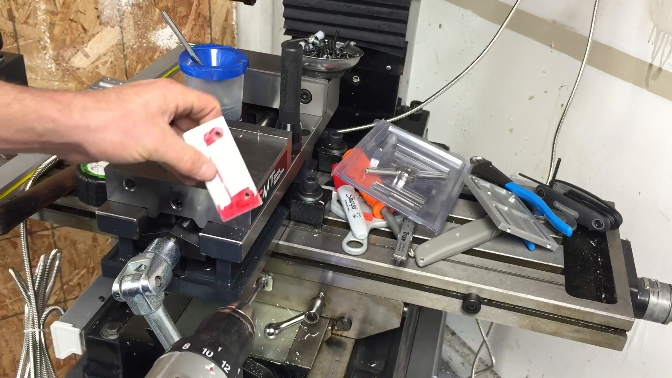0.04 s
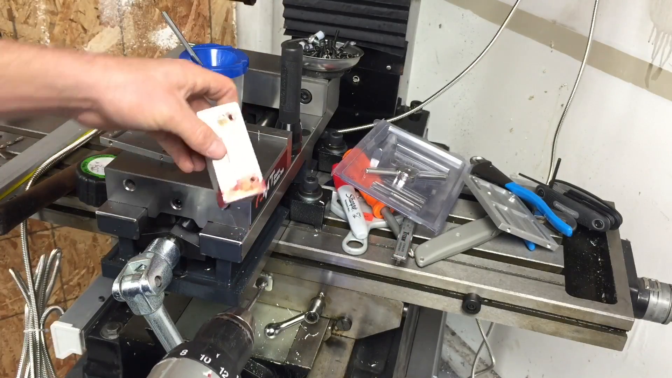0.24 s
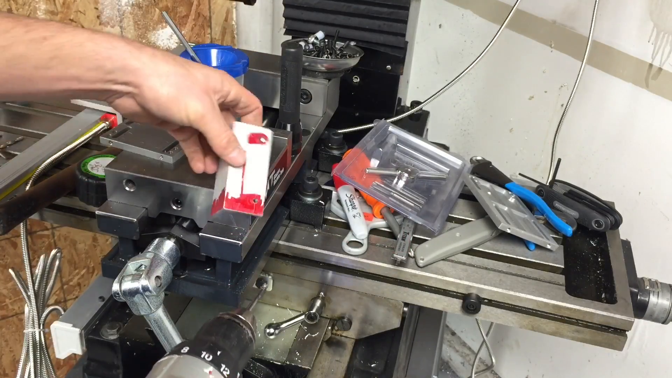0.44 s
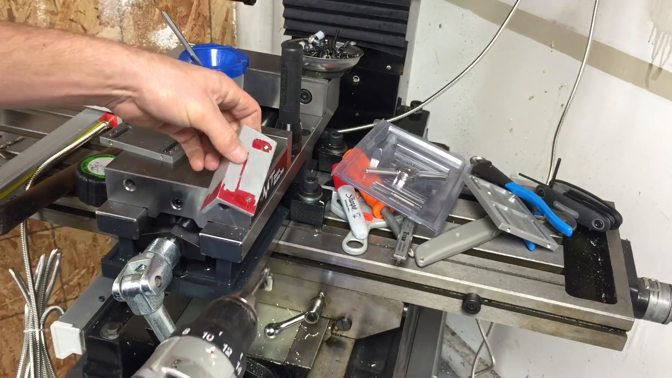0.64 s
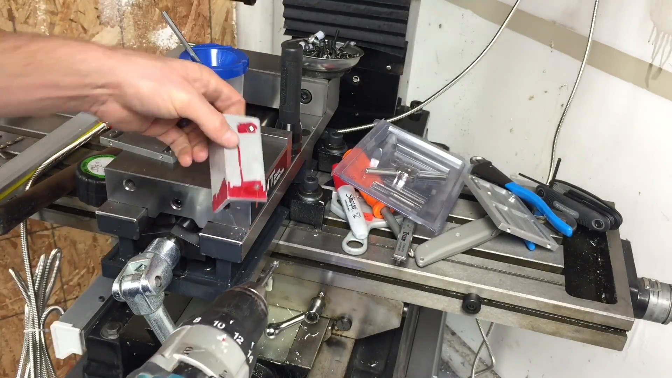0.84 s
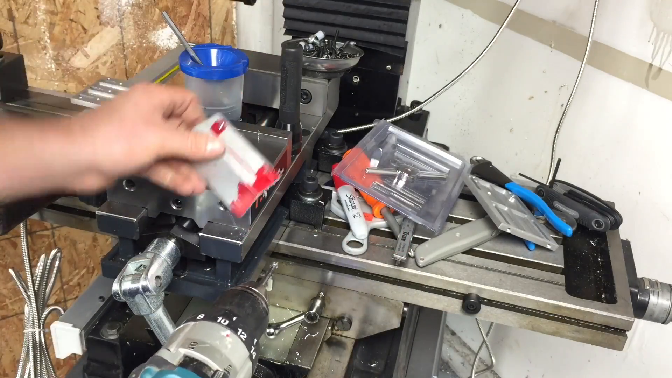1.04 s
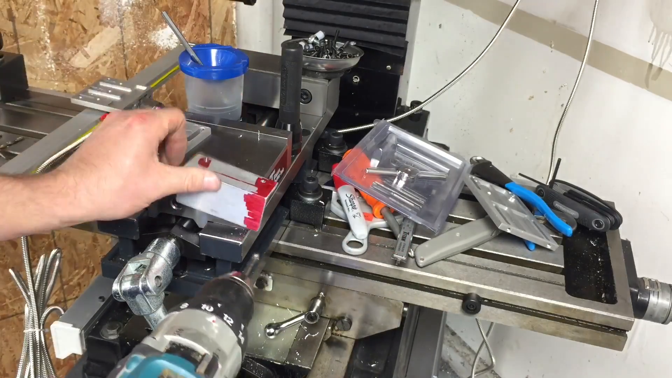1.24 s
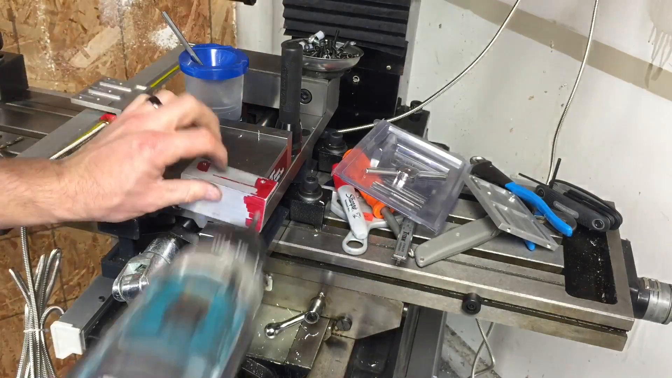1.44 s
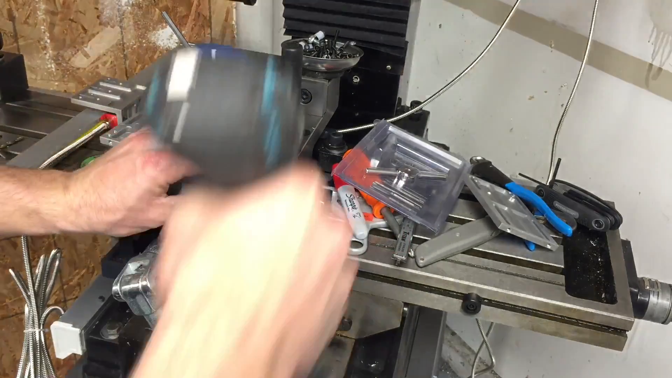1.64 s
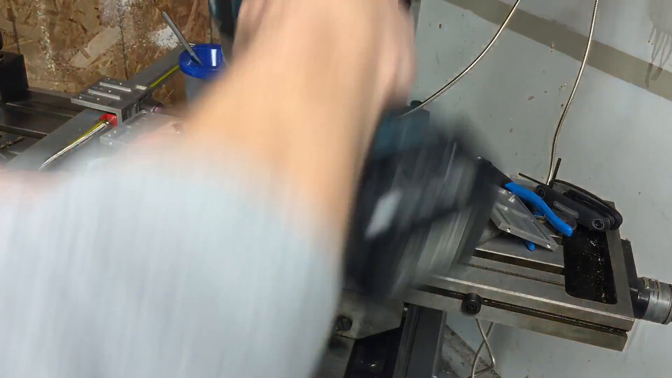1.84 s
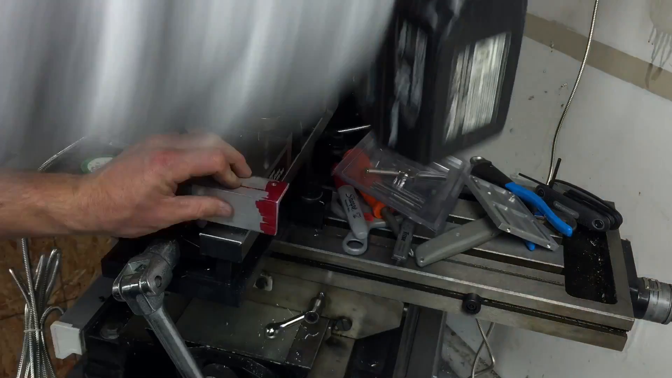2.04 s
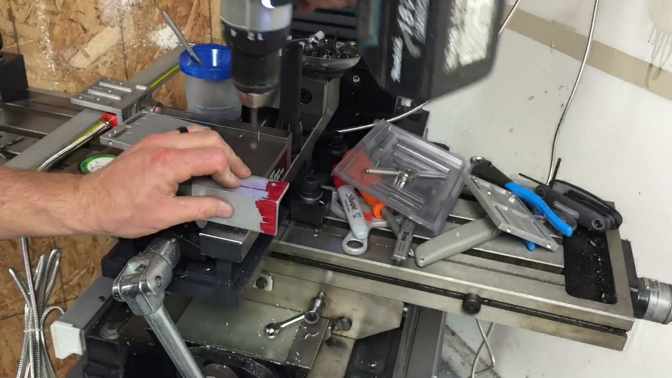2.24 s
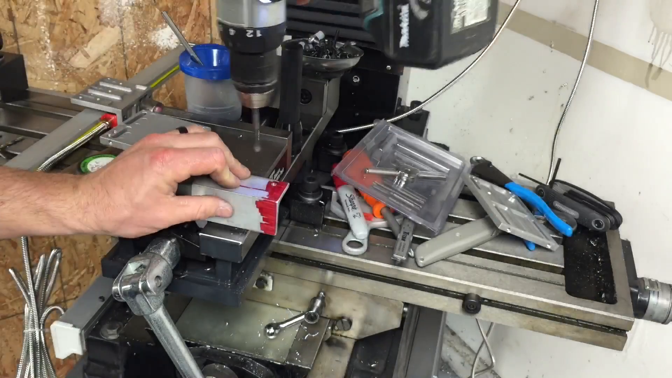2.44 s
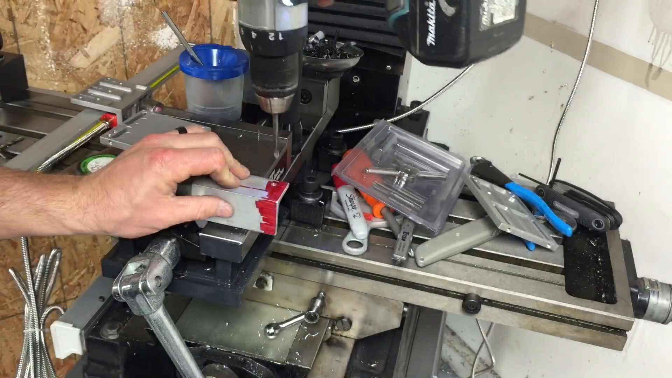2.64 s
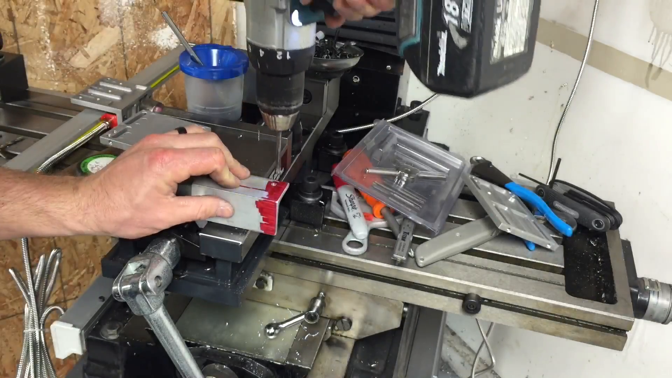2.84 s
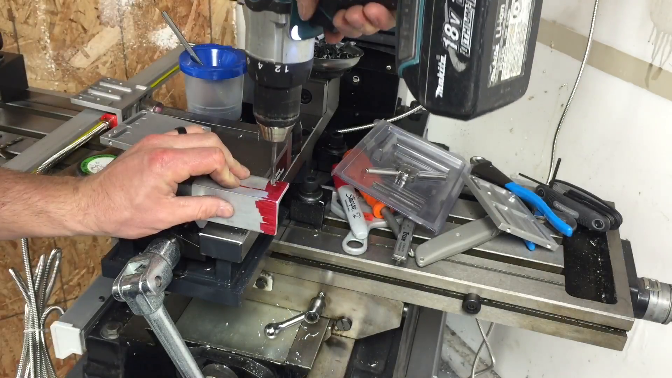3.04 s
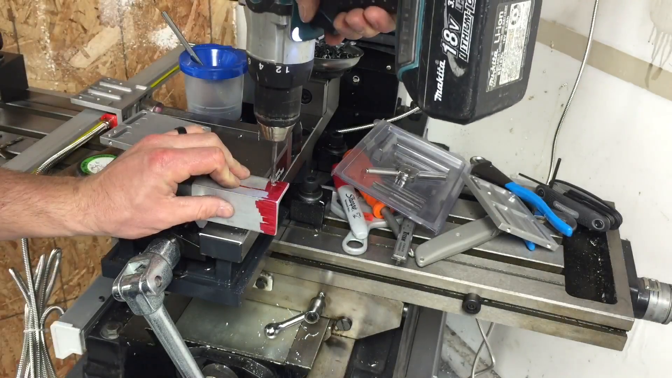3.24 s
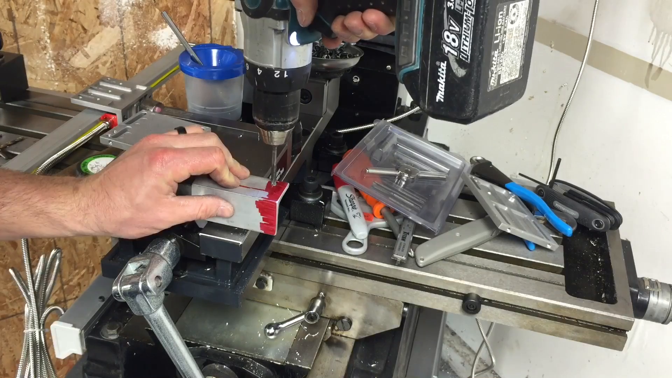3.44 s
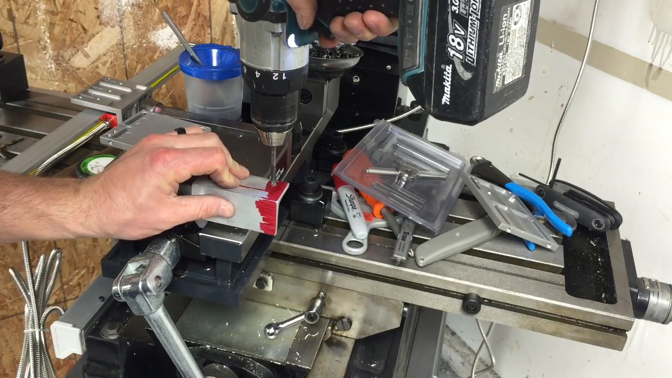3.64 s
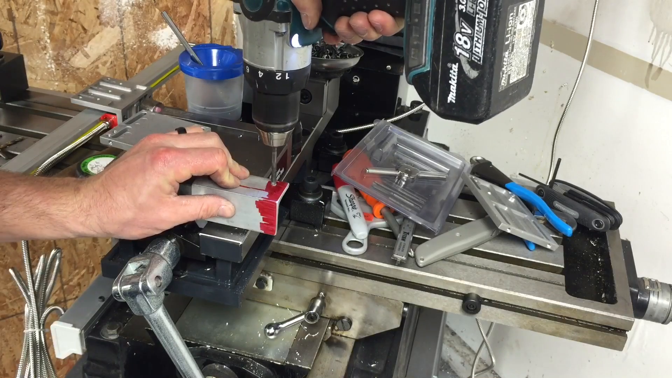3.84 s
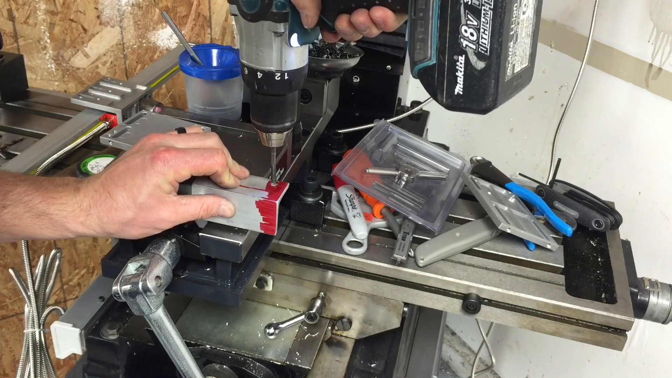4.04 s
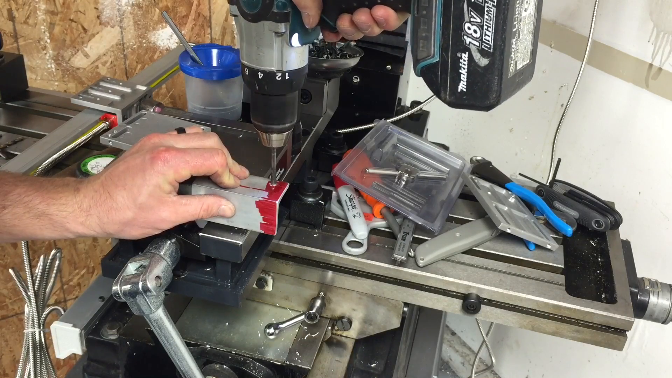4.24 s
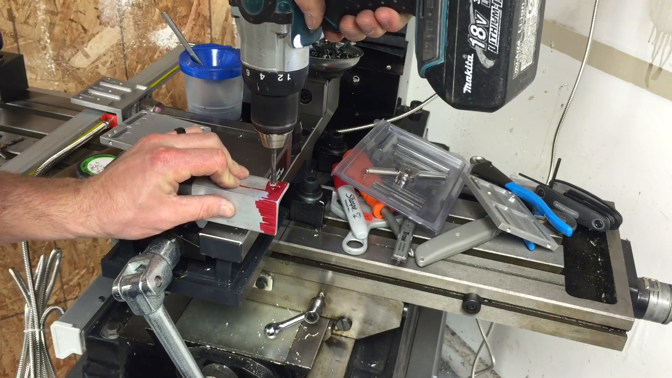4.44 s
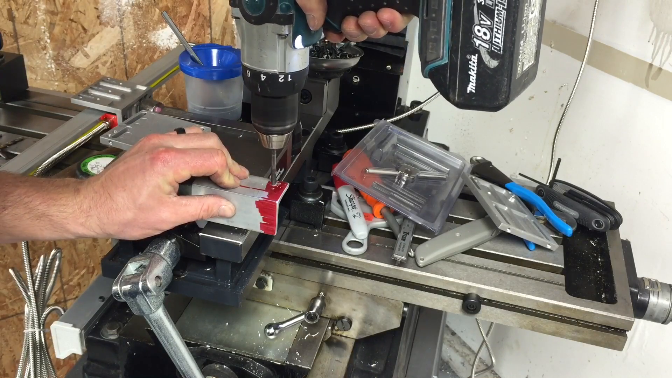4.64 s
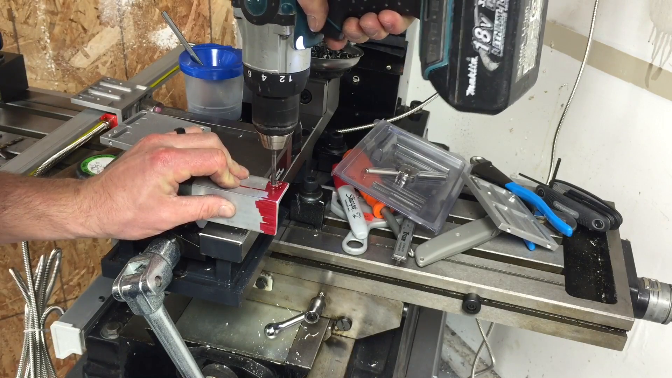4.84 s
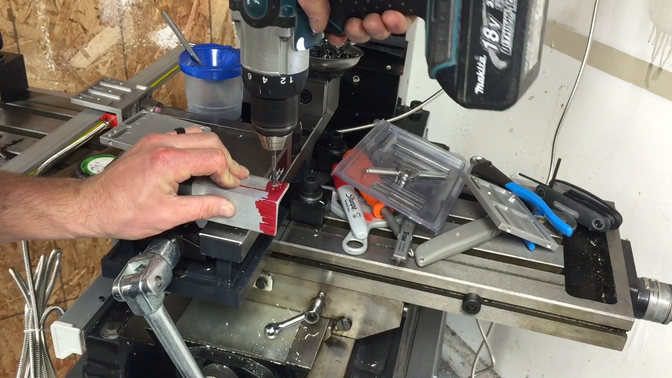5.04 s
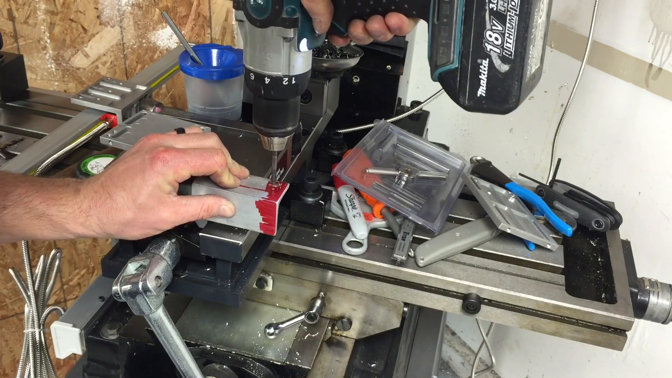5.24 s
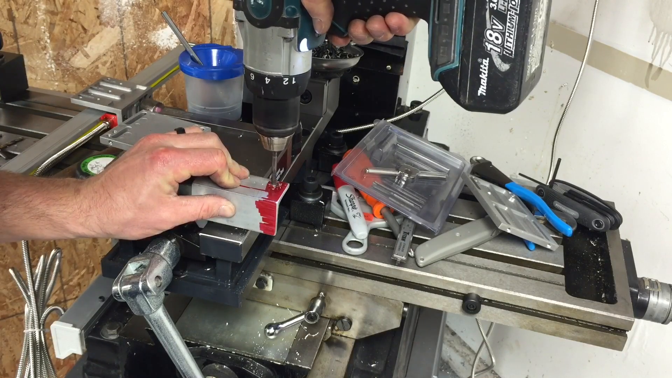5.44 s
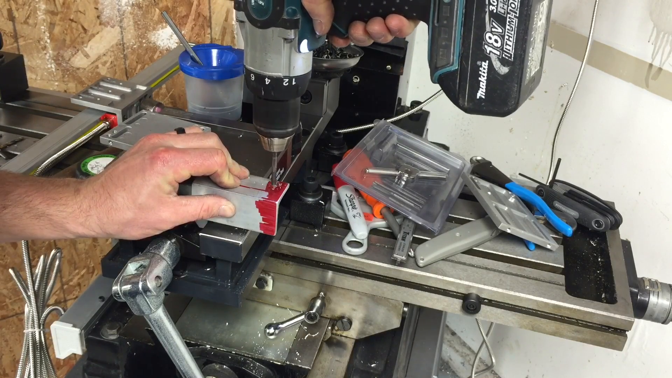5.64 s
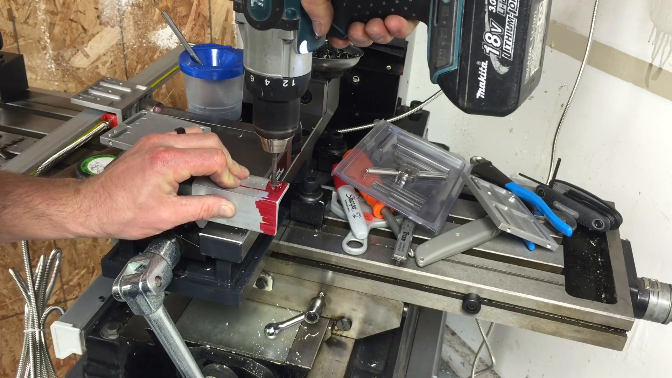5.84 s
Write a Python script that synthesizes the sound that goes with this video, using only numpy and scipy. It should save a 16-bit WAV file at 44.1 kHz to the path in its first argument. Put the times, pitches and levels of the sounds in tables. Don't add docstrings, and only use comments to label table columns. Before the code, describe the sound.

Close to the bench in a softly humming workshop, a small metal bracket clinks against a heavy vise, twice more in clusters, with brief scrapes. A drill switch snaps and the tool is nudged into place with dull clicks. After near quiet, the drill runs in two roughly one-second bursts, buzzing, hissing and whining with uneven gear speed. Short room echo.

```python
import sys
import numpy as np
from scipy import signal
from scipy.fft import rfft, irfft
from scipy.io import wavfile

SR = 44100
rng = np.random.default_rng(int(sys.argv[2]) if len(sys.argv) > 2 else 0)


def bounce(signal):
    frames = np.transpose(np.atleast_2d(signal))
    limited = np.clip(frames, -1, 1)
    pcm = np.round(limited * 32767).astype(np.int16)
    wavfile.write(sys.argv[1], SR, pcm)


def voltage_ratio(decibels):
    exponent = np.asarray(decibels, float) / 20
    return 10 ** exponent


N = 260345


def evened(x):
    return x / np.sqrt(np.mean(x ** 2) + 1e-20)


def read(points, hz):
    f, value = np.transpose(points)
    return np.interp(np.log(hz + 1), np.log(f + 1), value)


def add(mix, s, sound):
    part = mix[round(s * SR):][:len(sound)]
    part += sound[:len(part)]


def follow(rows, t):
    s, *columns = np.transpose(rows)
    return [np.interp(t, s, c) for c in columns]


def unroll(rows):
    start, end = rows[0][0], rows[-1][0]
    return start, follow(rows, np.arange(start, end, 1 / SR))


def colour(x, points):
    hz = abs(np.fft.fftfreq(4096, 1 / SR))
    log_gain = np.log(voltage_ratio(np.maximum(read(points, hz), -90)))
    minimum_phase = np.exp(np.conj(signal.hilbert(log_gain)))
    return signal.oaconvolve(x, np.fft.ifft(minimum_phase).real[:2048])[:len(x)]


def resonate(x, hz, width):
    return signal.lfilter(*signal.iirpeak(min(hz, .45 * SR), hz / width, SR), x)


def drift(n, hz):
    slow = signal.butter(2, hz, fs=SR, output="sos")
    return evened(signal.sosfilt(slow, rng.standard_normal(n + 9000))[9000:])


def ring(hz, db, t60, phase=0.):
    t = np.arange(16000) / SR
    onset = 1 - np.exp(-t / 0.00016)
    return voltage_ratio(db - 60 * t / max(t60, .004)) * np.sin(2 * np.pi * hz * t + phase) * onset


# (frequency [Hz], level [dB])
CHOP_SPECTRUM = [(100, -21.5), (250, 1.5), (500, 9.5), (770, -5.5), (1050, 12.5), (1300, 12), (1530, 14),
                 (1840, 3.5), (2500, 11.5), (3400, -16), (4800, -13.5)]


def chop_buzz(jolts, low_db, octaves, age):
    high_db = -38.5 - 5 * octaves + 3.5 * np.exp(-age / 0.032)
    low = voltage_ratio(low_db - 2.0) * evened(colour(sum(jolts[:3]), CHOP_SPECTRUM))
    high = voltage_ratio(high_db) * evened(colour(sum(jolts[3:]), CHOP_SPECTRUM))
    steady_pulse = voltage_ratio(-50.5) * jolts[0]
    return low + high + steady_pulse


# (frequency [Hz], level [dB per Hz])
RATTLE_SPECTRUM = [(60, -32), (150, -57), (250, -19), (500, -6), (830, -7), (1500, -0.5), (2400, -0.5),
                   (3600, -3), (4600, -6), (6500, -25), (9000, -63.5)]
# (frequency [Hz], level [dB per Hz])
HISS_SPECTRUM = [(2940, -11.5), (5000, 1.5), (6140, -0.5), (7310, -1.5), (9620, -4), (11100, -4.5),
                 (15700, -16.5), (16300, -31), (16500, -64)]
# (frequency [Hz], width [Hz], level [dB])
HOUSING_MODES = [(1506, 88, -35.5), (3690, 1200, -7), (5410, 104, 1.5), (7300, 510, -1),
                 (10600, 1700, -30.5), (14700, 1100, -3)]
# (frequency [Hz], width [Hz], level [dB])
VENTS = [(6880, 310, -21.5), (11140, 1020, -2)]


def rattle_and_hiss(turns, effort_db, octaves):
    n = len(turns)
    rattle_db = -36 + 0.49 * (effort_db + 36) + 3 * octaves
    beat = 4.3 + np.exp(-(turns % 1) / 2.7)
    knock_db = 0.55 * np.minimum(rng.exponential(1, n), 4.5)
    teeth = evened(rng.standard_normal(n) * voltage_ratio(knock_db) * (rng.random(n) < 6000 / SR))
    rattle = evened(colour(teeth * beat * voltage_ratio(0.8 * drift(n, 32)), RATTLE_SPECTRUM))
    rubbing = (rng.standard_normal(n) + 0.4 * teeth) * (beat + .5) * voltage_ratio(drift(n, 23))
    brushes = evened(colour(rubbing, HISS_SPECTRUM))
    bare = voltage_ratio(rattle_db + 3.0) * rattle + brushes * voltage_ratio(effort_db - 0.8)
    sound = bare.copy()
    for hz, width, db in HOUSING_MODES:
        mode = resonate(resonate(bare, hz, width), hz, 1.7 * width)
        sound += voltage_ratio(db + 0.66 * drift(n, 5.7)) * mode
    fan_db = effort_db - 9 * octaves + drift(n, 2.2)
    for hz, width, db in VENTS:
        sound += voltage_ratio(fan_db + db) * resonate(resonate(brushes, hz, width), hz, 1.5 * width)
    return voltage_ratio(-1.0) * sound


def squeal(jolt, chop_hz, octaves, age):
    mode_hz, width_hz = 1510, 110
    nearness = 1 / (1 + ((6 * chop_hz - mode_hz) / width_hz) ** 2)
    level = voltage_ratio(-40 - 9 * octaves) * np.minimum(age / .3, 1)
    return jolt * voltage_ratio(2.5 * drift(len(jolt), 45)) * nearness * level


# (time [s], level [dB], length [s])
GRAB_EVENTS = [
    (4.283, -62, 0.17),
    (4.563, -43, 0.061),
    (4.684, -43.5, .09),
    (5.04, -68, .05),
    (5.255, -59, 0.065),
    (5.477, -61, 0.17),
]


def vise_shake(t):
    grip = voltage_ratio(-83)
    for at, db, length in GRAB_EVENTS:
        grip = grip + voltage_ratio(db) * np.exp(-(2 * (t - at) / length) ** 2)
    return grip * evened(resonate(resonate(rng.standard_normal(len(t)), 113, 160), 176, 240))


# (time [s], current chops [Hz], jolt level [dB])
TRIGGER_PULLS = [
    [(3.755, 201.8, -42), (3.81, 255.7, -38), (3.865, 208.8, -46), (3.97, 210.4, -38), (4.06, 237, -40.5),
     (4.385, 260.5, -40.5), (4.52, 241.8, -50.5), (4.76, 250.9, -45.5), (4.865, 266.3, -44)],
    [(4.995, 201.7, -42.5), (5.045, 259.6, -39), (5.07, 271.9, -38), (5.18, 263, -42), (5.53, 251.8, -38),
     (5.66, 237.6, -43.5), (5.8, 217.5, -39.5), (5.903, 208.2, -45)],
]
# (time [s], tooth rate [Hz], whine level [dB])
GEAR_PULLS = [
    [(3.83, 900, -41.5), (3.95, 870, -40), (4.12, 665, -43), (4.35, 530, -47), (4.48, 1000, -34),
     (4.575, 1105, -31), (4.635, 1030, -33), (4.76, 1045, -34), (4.85, 945, -39)],
    [(5.05, 570, -52), (5.27, 680, -48), (5.47, 555, -46), (5.64, 560, -44), (5.70, 870, -37),
     (5.74, 975, -36), (5.80, 995, -37), (5.86, 1125, -35), (5.903, 1135, -34)],
]
# (time [s], level [dB])
EFFORT_PULLS = [
    [(3.755, -62), (3.78, -45.5), (3.81, -35), (3.94, -32.5), (4.02, -36), (4.28, -32.5), (4.35, -35),
     (4.55, -33), (4.865, -34.5)],
    [(4.995, -54.5), (5.04, -55.5), (5.093, -38.5), (5.23, -33.5), (5.45, -38.5), (5.6, -38),
     (5.645, -31.5), (5.69, -34), (5.903, -32.5)],
]


def motor(trigger, gears, effort):
    s, (chop_hz, low_db) = unroll(trigger)
    n = len(low_db)
    age = np.arange(n) / SR
    t = s + age
    (effort_db,) = follow(effort, t)
    octaves = np.log2(follow(gears, t)[0] / 700)
    turns = np.cumsum(chop_hz * (1 + .003 * drift(n, 30))) / SR - .25
    jolts = [-np.cos(2 * np.pi * k * turns) * voltage_ratio(1.4 * drift(n, 10)) for k in range(1, 19)]
    sound = chop_buzz(jolts, low_db, octaves, age)
    sound += rattle_and_hiss(turns, effort_db, octaves)
    sound += squeal(jolts[5], chop_hz, octaves, age)
    no_bass = signal.butter(4, 150, "high", fs=SR, output="sos")
    return s, (signal.sosfilt(no_bass, sound) + vise_shake(t)) * signal.windows.tukey(n, .004)


# (multiple of the tooth rate, level under the octave [dB])
HIGHER_LINES = [
    (4, -2.5),
    (3, -10),
    (3.08, -11),
]


def whine(rows):
    teeth, ring_gear, planets = 13.5, .31, 3.27
    s, (hz, db) = unroll(rows)
    n = len(db)
    hz = hz * (1 - 0.37 * np.exp(-np.arange(n) / SR / .025))
    octave_db = db - 0.5
    hum_db = db - 19.5 + 0.82 * np.minimum(db + 42.5, 0)
    angle = 2 * np.pi * np.cumsum(hz * (1 + 0.00747 * drift(n, 39.3))) / SR
    depth = np.clip((hz - 880) / 150, 0, 1)
    lowered = angle - np.pi * np.cumsum(hz * depth / teeth) / SR
    swing = np.cos(angle / teeth)
    wobble = 1 - 0.32 * depth + 0.87 * depth * swing
    tone = voltage_ratio(db - 1.5 + 2.2 * drift(n, 33)) * wobble * np.sin(lowered)
    tone += voltage_ratio(octave_db + 1.7 * depth + 3.0 * drift(n, 81)) * np.sin(2 * angle) * (1 + 0.3 * swing)
    tone += voltage_ratio(hum_db - 2.0 * depth + 2.0 * drift(n, 22)) * np.sin(ring_gear * angle)
    planet_db = -39.5 + 0.6 * (db + 41) - 3.0 * np.maximum(db + 40, 0)
    planet_db -= .004 * SR * np.maximum(np.gradient(hz), 0)
    tone += voltage_ratio(planet_db + 3.5 * drift(n, 30)) * np.sin(planets * angle)
    for k, order_db in HIGHER_LINES:
        level = voltage_ratio(octave_db - 2.0 * (2 - depth) + order_db + 2 * drift(n, 32))
        tone += level * np.sin(k * angle + 0.14 * drift(n, 79)) * (1 + 0.2 * swing)
    return s, np.sqrt(2) * tone * signal.windows.tukey(n, .05)


HELD_RINGS = [
    [3203, 3300],
    [4735, 4786, 5394],
    [6045, 6422, 6546, 7865, 7890, 8550],
    [12120, 13230, 14710],
]
LAID_RINGS = [
    [3332, 3290],
    [4555, 4790, 4640],
    [6095, 6508, 6665, 8010, 8172, 8737],
    [12200, 13200, 14780],
]
# (level [dB], t60 [s])
RING_DECAYS = [
    [(-4, 0.044), (-8.5, 0.081)],
    [(-5.5, 0.059), (-2, 0.041), (-21.5, 0.033)],
    [(-4.5, 0.067), (-1.5, .045), (-10.5, 0.041), (-6.5, .06), (-12, 0.047), (-19.5, .04)],
    [(-4, 0.073), (-0.5, .09), (-7.5, 0.055)],
]


def rings(s):
    pitches = LAID_RINGS if s > 1.25 else HELD_RINGS
    return [[(hz, *rest) for hz, rest in zip(*group)] for group in zip(pitches, RING_DECAYS)]


# (frequency [Hz], level [dB], t60 [s])
VISE_MODES = [(640, -22, 0.14), (1120, -20.5, .05), (1374, -6, .04), (1562, -3.5, 0.025), (1740, 5.5, 0.04),
              (2182, 7, 0.016), (2480, 5, 0.014), (2720, -7.5, 0.075)]
# (time [s], vise [dB], lowest rings [dB], upper rings [dB], sharpness [dB])
CLINK_EVENTS = [(.4833, -17.5, -12, -23.5, -5), (0.506, -52, -23, -52, 7.5),
                (0.5179, -47.5, -34, -52, -0.5), (0.5458, -63, -50, -56, -7),
                (1.1844, -16.5, -22.5, -10, -16), (1.1907, -15.5, -23, -11, -2.5),
                (1.2054, -16.5, -26.5, -23.5, 1.5), (1.2274, -24, -42, -36.5, -5),
                (1.2994, -20.5, -21.5, -15, 2), (1.3294, -34, -36, -53, 8), (1.5857, -48, -57, -51, 17),
                (1.5973, -32, -30, -36, -4), (1.6087, -26, -19, -31, 8.5), (1.6691, -36, -35.5, -46, -16)]


def clink(s, vise_db, low, mid, sharp_db):
    t = np.arange(16000) / SR
    high = mid + sharp_db
    top = mid - 15.5 + 1.3 * sharp_db
    spread = [(200, vise_db - 28.5), (500, vise_db - 10.5), (2000, vise_db), (3250, low - 3),
              (4700, mid - 4), (7000, high - 6), (13000, top - 8)]
    burst = np.exp(-t / 0.0054) + .1 * np.exp(-t / 0.014)
    sound = voltage_ratio(5.0) * colour(rng.standard_normal(16000) * burst, spread)
    for hz, db, t60 in VISE_MODES:
        sound += ring(hz * rng.uniform(0.93, 1.02), vise_db + db - 13.0, t60, rng.uniform(0, 8.2))
    for level_db, modes in zip((low, mid, high, top), rings(s)):
        for hz, db, t60 in modes:
            sound += ring(hz, level_db + db, t60, rng.uniform(0, 4.7))
    return s, sound


# (time [s], level [dB])
DRAG_CURVES = [
    [(1.44, -56), (1.492, -41), (1.54, -104)],
    [(1.565, -67), (1.585, -34.5), (1.603, -40)],
    [(1.63, -62), (1.658, -45), (1.672, -51), (1.702, -70), (1.72, -74)],
]


def drag(rows):
    s, (db,) = unroll(rows)
    n = len(db)
    slips = evened(rng.standard_normal(n) * voltage_ratio(2.8 * rng.exponential(1, n))) * voltage_ratio(db)
    body = sum(ring(hz, -3.5, 0.32 * t60) for modes in rings(s) for hz, _, t60 in modes)
    body += sum(ring(hz, mode_db, 0.25 * t60) for hz, mode_db, t60 in VISE_MODES)
    body[:3] += np.array([1, 0, -1]) * 2.0
    return s, voltage_ratio(-5.5) * signal.fftconvolve(slips, body) / np.linalg.norm(body)


def tick(s, clunk_db, hz, crack_db, tilt_db, decay_s):
    t = np.arange(16000) / SR
    fade = np.exp(-t / decay_s) + 0.06 * np.exp(-t / (5.0 * decay_s))
    shape = fade * (1 - np.exp(-t / (.3 * decay_s)))
    spectrum = [(300, -13), (1200, 9.0 - tilt_db), (4000, 10.0), (7500, 10.5 + 1.2 * tilt_db),
                (15000, 3 * tilt_db)]
    crack = evened(colour(rng.standard_normal(16000), spectrum))
    width_hz = 330 * (hz / 1000) ** .6
    clunk = resonate(resonate(rng.standard_normal(16000) * shape, hz, width_hz), hz, 2 * width_hz)
    return s, voltage_ratio(crack_db + 9) * crack * shape + voltage_ratio(clunk_db + 2) * clunk / abs(clunk).max()


# (time [s], clunk level [dB], clunk pitch [Hz], crack level [dB])
SNAP_EVENTS = [
    (1.8028, -50, 2600, -43),
    (1.8073, -28.5, 3500, -29.5),
    (1.808, -27, 9200, -48),
    (1.8123, -31.5, 1520, -44),
    (1.8714, -30, 1440, -27.5),
    (3.717, -60, 2340, -62),
    (3.731, -60, 3020, -61),
    (3.741, -47, 2400, -53.5),
    (4.944, -70, 2480, -61),
    (4.971, -56, 2470, -52),
]


def snap(s, clunk_db, hz, crack_db):
    return tick(s, clunk_db, hz, crack_db, tilt_db=-1, decay_s=0.0032)


# (time [s], level [dB], pitch [Hz])
NUDGE_EVENTS = [(1.496, -41.5, 1360), (1.612, -33.5, 930), (1.612, -40.5, 494), (1.7416, -46.5, 1600),
                (2.026, -46.5, 1330), (2.0314, -51, 1930), (3.1697, -36.5, 1350), (3.172, -41, 3580),
                (3.171, -47.5, 6900), (3.177, -49.5, 290), (3.191, -49, 1310), (3.386, -43, 3540),
                (3.413, -47, 4030), (3.417, -47.5, 6550), (3.426, -50.5, 413), (3.4293, -36.5, 3500),
                (3.43, -36, 1250), (3.467, -50, 1180), (4.845, -40, 680)]


def nudge(s, db, hz):
    return tick(s, db, hz, db - 27, tilt_db=-14, decay_s=0.0033)


# (time [s], level [dB])
THUMP_CURVE = [(3.4, -65), (3.448, -59), (3.516, -61), (3.534, -57), (3.562, -71), (3.584, -66),
               (3.62, -77)]


def thump(rows):
    s, (db,) = unroll(rows)
    return s, voltage_ratio(db) * evened(resonate(resonate(rng.standard_normal(len(db)), 90, 48), 83, 58))


# (time [s], level [dB])
RUSTLE_CURVE = [(0, -70.5), (.45, -71.5), (1.1, -76), (2.05, -70.5), (2.35, -74), (2.5, -79.5), (3.6, -79),
                (5.903, -75)]
# (frequency [Hz], level [dB per Hz])
CLOTH_SPECTRUM = [(300, 1), (1200, 1.5), (3800, -1), (4500, 0), (5200, -5.5), (12000, -13), (16000, -13)]


def rustle(rows):
    s, (db,) = unroll(rows)
    n = len(db)
    return s, voltage_ratio(db + 0.96 * drift(n, 8)) * evened(colour(rng.standard_normal(n), CLOTH_SPECTRUM))


# (frequency [Hz], level [dB per Hz])
AIR_SPECTRUM = [(20, -37.5), (45, -7), (90, -6), (226, -12.5), (368, -12), (510, -12), (726, -14.5),
                (1050, -16), (1220, -21.5), (1400, -21.5), (4500, -28.5), (10500, -32.5), (15500, -33.5),
                (16500, -50)]
# (frequency [Hz], level [dB])
MACHINE_LINES = [(511.4, -83.5), (570.6, -91), (597.5, -78.5), (721.4, -74), (748.3, -71.5), (807.5, -91),
                 (839.8, -77.5), (872.1, -84), (899.0, -87.5), (931.3, -86), (990.5, -88), (1050, -83.5)]
# (frequency [Hz], level [dB])
MAINS_LINES = [
    (61.5, -69.5),
    (120, -73),
]


def shop_noise():
    t = np.arange(N) / SR
    hz = np.fft.rfftfreq(N, 1 / SR)
    sound = voltage_ratio(-68) * evened(irfft(rfft(rng.standard_normal(N)) * voltage_ratio(read(AIR_SPECTRUM, hz)), N))
    for f, db in [*MACHINE_LINES, *MAINS_LINES]:
        level = np.sqrt(2) * voltage_ratio(db + f / 250 * drift(N, 3.3))
        sound += level * np.sin(2 * np.pi * f * t + f / 700 * drift(N, 3))
    return sound


# (frequency [Hz], t60 [s])
SHOP_DECAY = [
    (200, 0.24),
    (1000, 0.24),
    (4000, 0.28),
    (14000, .2),
]


def shop(x):
    taps = np.zeros(SR // 2)
    at = np.arange(200, SR // 2 - 20, 20) + rng.integers(0, 20, (SR // 2 - 201) // 20)
    taps[at] = rng.choice([-1., 1.], at.shape)
    hz, t, z = signal.stft(taps, SR, nperseg=256)
    fade = voltage_ratio(-60 * t / read(SHOP_DECAY, hz)[:, None])
    tail = signal.istft(z * fade, SR, nperseg=256)[1]
    return signal.fftconvolve(x, tail / np.linalg.norm(tail))[:N]


def scene():
    near = np.zeros(N)
    for pull in zip(TRIGGER_PULLS, GEAR_PULLS, EFFORT_PULLS):
        add(near, *motor(*pull))
    for rows in GEAR_PULLS:
        add(near, *whine(rows))
    for row in CLINK_EVENTS:
        add(near, *clink(*row))
    for rows in DRAG_CURVES:
        add(near, *drag(rows))
    for row in SNAP_EVENTS:
        add(near, *snap(*row))
    for row in NUDGE_EVENTS:
        add(near, *nudge(*row))
    add(near, *thump(THUMP_CURVE))
    add(near, *rustle(RUSTLE_CURVE))
    return np.tile(near + voltage_ratio(-10.5) * shop(near) + shop_noise(), (2, 1))


def roll_off(x):
    return signal.sosfilt(signal.butter(12, 16850, fs=SR, output="sos"), x)


def record(dry):
    low_pass = signal.firwin(511, 15780, window=("kaiser", 9), fs=SR)
    mix = signal.oaconvolve(dry, low_pass[None], "same")
    return roll_off(mix)


dry = scene()
out = record(dry)
bounce(out)
```